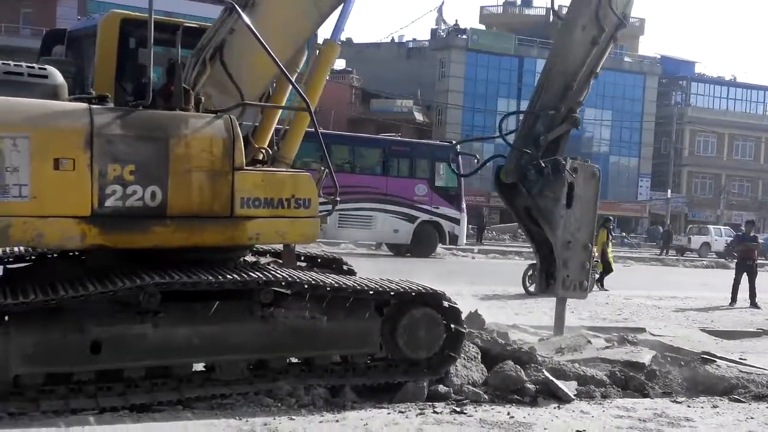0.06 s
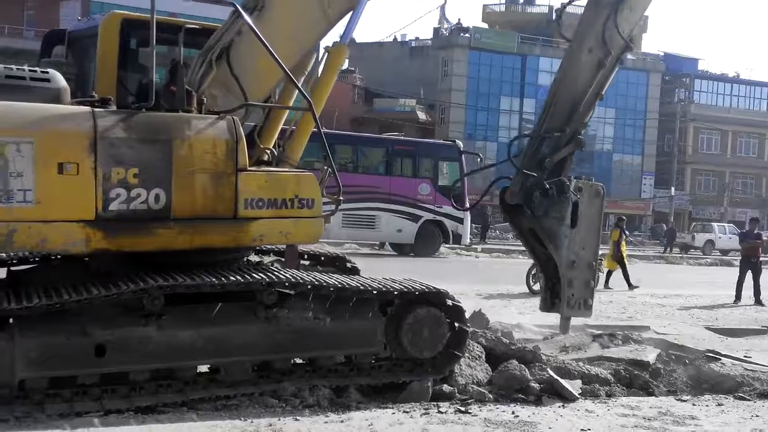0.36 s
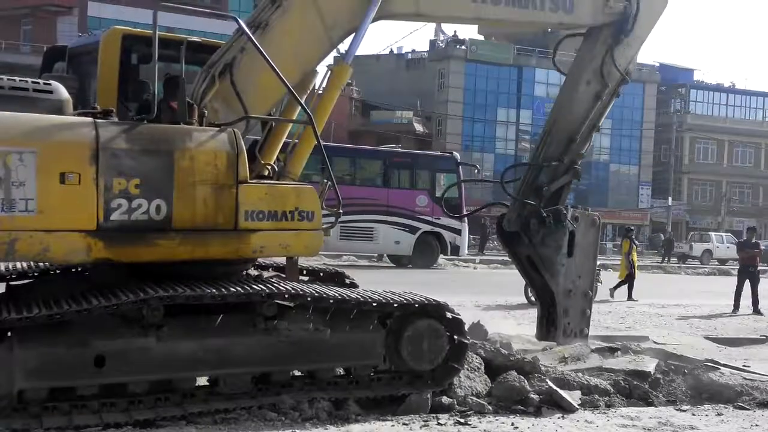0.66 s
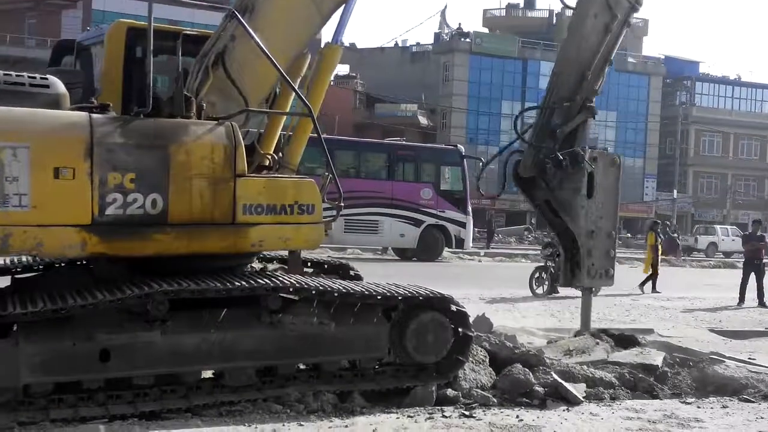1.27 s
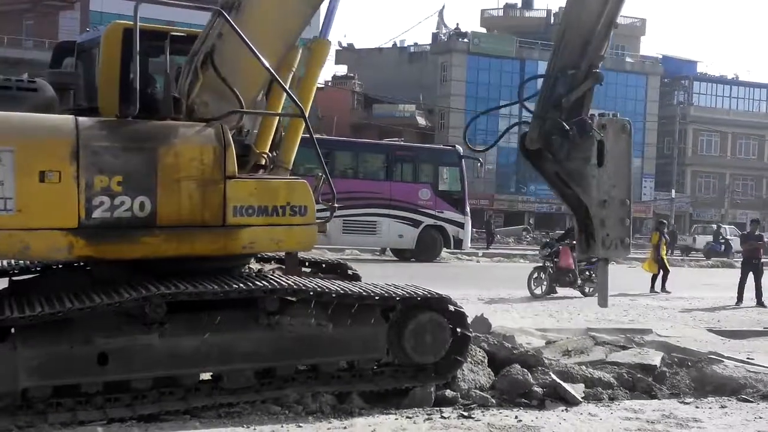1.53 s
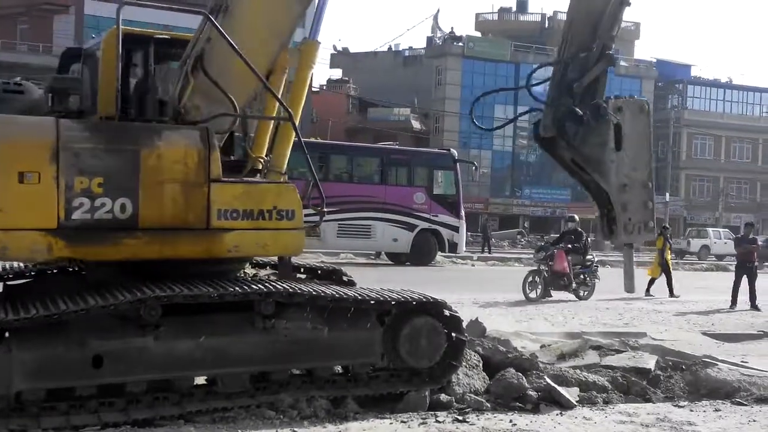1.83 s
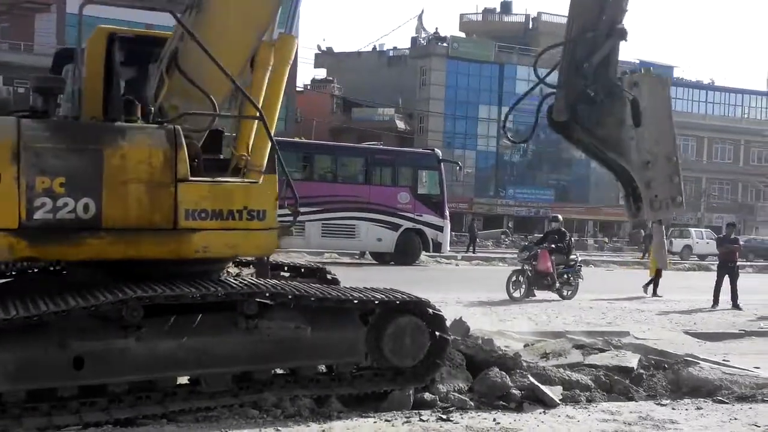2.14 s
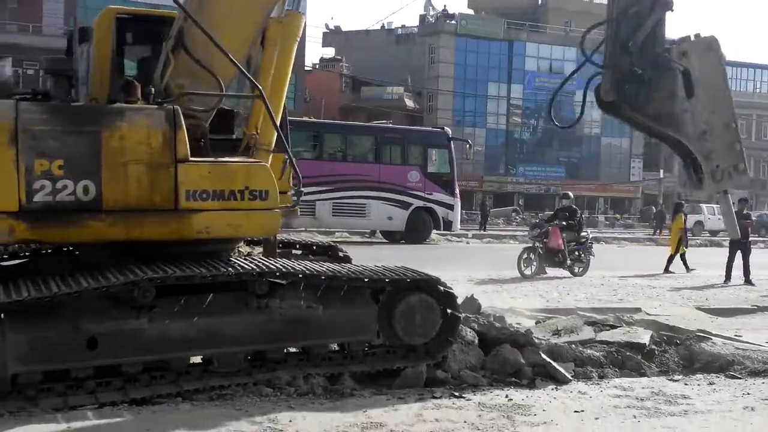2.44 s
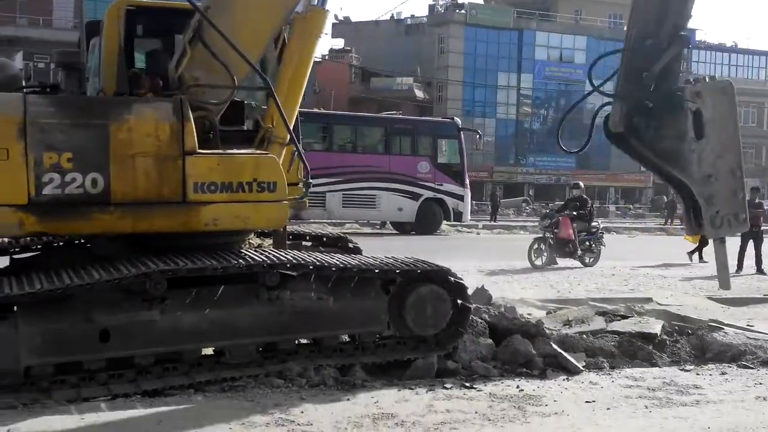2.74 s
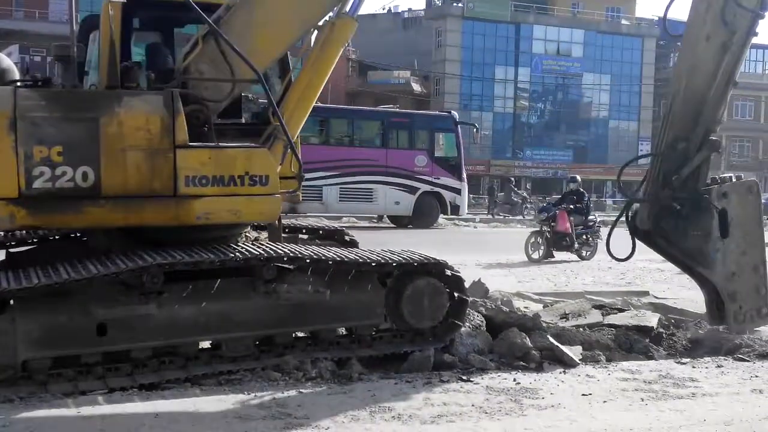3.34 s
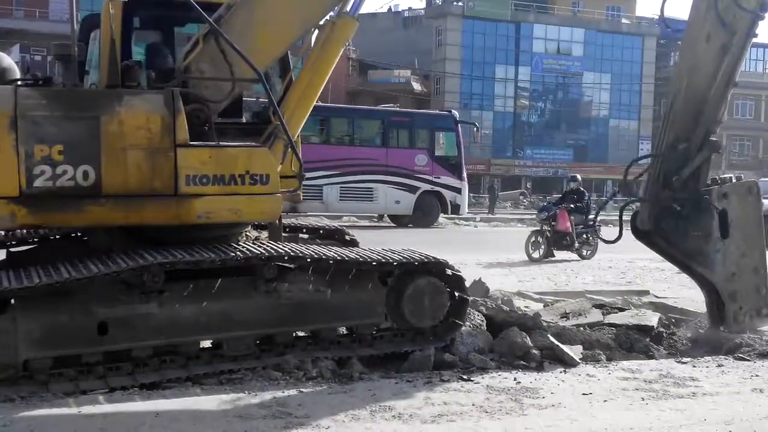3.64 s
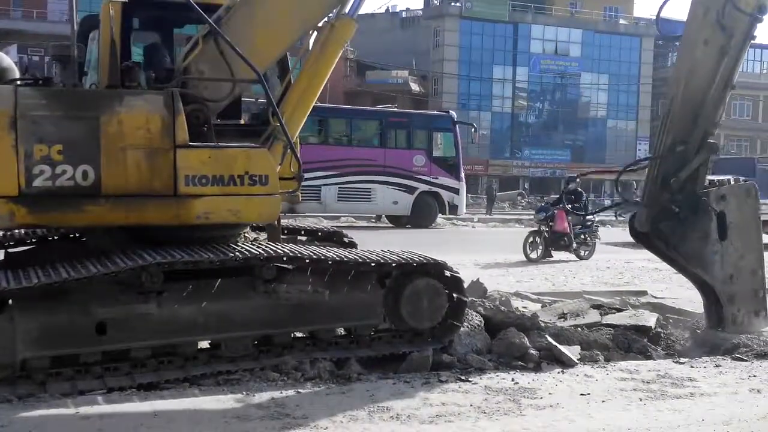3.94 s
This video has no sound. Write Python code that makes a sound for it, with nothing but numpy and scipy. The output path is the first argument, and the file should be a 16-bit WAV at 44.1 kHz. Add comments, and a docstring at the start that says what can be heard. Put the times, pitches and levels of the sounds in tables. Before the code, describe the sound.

An excavator drags its steel chisel through broken pavement twice, grinding, squeaking and clanking as chips snap and slabs thud over. Between drags, the diesel drones and hydraulics hiss. Faint street echoes follow the blows.

```python
"""Excavator prying up pavement

Beside a street, an excavator drags the chisel of its hydraulic breaker through broken pavement.
The chisel grinds, squeaks, clanks in its steel housing and snaps off chips; slabs thud over.
Underneath, the diesel drones, its turbocharger whistles and oil hisses in the valves.
The loudest blows overload the microphone."""
import sys
import numpy as np
from scipy import signal
from scipy.fft import rfft, irfft
from scipy.io import wavfile
from scipy.ndimage import uniform_filter1d

SR = 44100
rng = np.random.default_rng(int(sys.argv[2]) if len(sys.argv) > 2 else 0)


def master(y):
    """Save y as 16-bit WAV."""
    cut = np.clip(np.atleast_2d(y).T, -1, 1)
    pcm = np.round(cut * 32767)  # scale
    wavfile.write(sys.argv[1], SR, pcm.astype(np.int16))


N = 176400
T = np.arange(N) / SR

# the notes the steel housing rings at: pitch_hz, level_db, fade_s (time to fall by 60 dB)
HOUSING_NOTES = [(409.4, -3, 0.25), (692.6, 3, 0.21), (863, -3, 0.084), (1010, -9, .26), (1143, -8.5, 0.29),
                 (1247, 0, 0.28), (1395, 8.5, 0.067), (1740, -5, 0.25), (1904, -5.5, 0.19),
                 (2167, 5.5, 0.062), (2495, -4, 0.21), (3090, -13, 0.14)]
# the notes the chisel rings at: pitch_hz, level_db, fade_s
CHISEL_NOTES = [(1435, 1, 0.078), (2620, -10.5, 0.098), (2850, -3.5, 0.096), (3210, -12, 0.052),
                (3715, -4.5, 0.067), (4220, -9, 0.087), (5130, -2.5, 0.082), (6500, -5, 0.045),
                (7230, -10, 0.12), (8300, -6, 0.1), (8670, -8.5, 0.3), (9300, -23, 0.18),
                (10900, -16, 0.21)]


def from_db(db):
    """Turn decibels into a number to multiply by."""
    return 10 ** (np.asarray(db) / 20)


def unit_power(x):
    """Scale a signal to an average power of 1."""
    return x / np.sqrt(np.mean(x ** 2) + 1e-20)


def in_time(rows, outside=None):
    """Join rows of (time, values) with straight lines: one curve for each value column."""
    times, *columns = np.transpose(rows)
    return [np.interp(T, times, column, outside, outside) for column in columns]


def colour(x, spectrum):
    """Make some pitches stronger than others; those beyond the table's ends fall away."""
    hz, db = np.transpose(spectrum)
    log_hz = np.log(np.maximum(np.arange(N // 2 + 1) * SR / N, 1))
    beyond = np.abs(log_hz - np.clip(log_hz, np.log(hz[0]), np.log(hz[-1])))
    gain = from_db(np.interp(log_hz, np.log(hz), db)) * np.exp(-2 * beyond)
    return unit_power(irfft(rfft(x) * gain, N))


def noise(spectrum):
    """Steady noise with the given tone colour."""
    return colour(rng.standard_normal(N), spectrum)


def drift(rate_hz):
    """A smooth random wander of about 1 either way, mostly slower than rate_hz."""
    step, points = 32, 8192
    times = T[::step]
    hz = np.fft.rfftfreq(points, step / SR)
    slow = irfft(rfft(rng.standard_normal(points)) / (1 + (hz / rate_hz) ** 2))
    return unit_power(np.interp(T, times, slow[:len(times)]))


def burst(start_s, hold_s, fade_s, attack_s=0.002):
    """The loudness of one blow: it rises, holds, then falls 60 dB every fade_s, down to -120 dB."""
    age = T - start_s
    fall = np.clip((age - attack_s - hold_s) / fade_s, 0, 2)
    return np.clip(age / attack_s, 0, 1) * from_db(-60 * fall)


def swells(rows):
    """Loudness that rises and falls in smooth, bell-shaped humps."""
    return sum(from_db(db) * np.exp(-((T - peak) / width) ** 2) for peak, width, db in rows)


def ring(x, hz, fade_s):
    """Each click in x sets off one dying note."""
    decay = np.exp(-np.log(1000) / (fade_s * SR))
    turn = 2 * np.pi * hz / SR
    return signal.lfilter([0, np.sin(turn)], [1, -2 * decay * np.cos(turn), decay * decay], x + 1e-18)


def resound(x, notes):
    """A body shaken by x rings at all its notes."""
    return unit_power(sum(from_db(db) * ring(x, hz, fade) for hz, db, fade in notes))


def strike(blows, notes):
    """Each blow rings every note of a body, some harder than others by chance."""
    starts, strength_db = np.transpose(blows)[:2]
    chance_db = rng.normal(0, 3.3, (len(starts), len(notes)))
    out = np.zeros(N)
    for k, (hz, db, fade) in enumerate(notes):
        clicks = np.zeros(N)
        clicks[(starts * SR).astype(int)] = from_db(strength_db + db + chance_db[:, k])
        out += (-1) ** k * ring(clicks, hz, fade)
    return out


def whistle(hz, width_hz):
    """A breathy tone: a narrow band of noise around a moving pitch."""
    phase = 2 * np.pi * np.cumsum(hz) / SR
    return drift(width_hz) * np.sin(phase) + drift(width_hz) * np.cos(phase)


def grains(per_s=2500, spread_db=1.5):
    """A dense crackle of tiny fractures, uneven in size."""
    sizes = from_db(spread_db * np.minimum(rng.exponential(1, N), 4)) * rng.choice([-1, 1], N)
    return sizes * (rng.random(N) < per_s / SR)


def crumble(x, spread_db=4):
    """Breaking stone keeps changing shape, so each pitch swells and fades at random."""
    spectra = signal.stft(x, nperseg=1024)[2]
    chance = uniform_filter1d(rng.standard_normal(spectra.shape), size=4, axis=0)  # smooth over pitch
    chance = unit_power(uniform_filter1d(chance, size=3, axis=1))  # and over time
    return signal.istft(spectra * unit_power(from_db(spread_db * chance)), nperseg=1024)[1][:N]


def scraping():
    """The juddering point crushes concrete into coarse and fine grit, and both make the steel ring."""
    # two drags of the chisel, each a list of: time_s, grind_db, grit_db
    strokes = [
        [(0, -23.5, -36), (.17, -24, -48), (.21, -13, -23.5), (.3, -18.5, -28.5), (.42, -24.5, -26.5),
         (.485, -32.5, -38), (.53, -17, -13), (.62, -11, -26), (.67, -25, -18.5), (.85, -13.5, -22),
         (.9, -18.5, -15), (.97, -16, -14.5), (1.0, -24, -16.5), (1.1, -23, -28.5), (1.19, -64, -50)],
        [(2.695, -20.5, -33), (2.72, -17, -15), (2.83, -12, -16), (2.92, -15.5, -20.5), (3.07, -18.5, -30),
         (3.14, -25, -36), (3.21, -24, -50), (3.235, -14.5, -16), (3.32, -14, -14.5), (3.4, -11.5, -17.5),
         (3.48, -12.5, -15), (3.59, -16, -14.5), (3.68, -22, -26.5), (3.8, -41, -45), (3.895, -32, -47),
         (3.92, -23.5, -13.5), (4, -16, -26)],
    ]
    # tone colour of the coarse grinding: pitch_hz, level_db
    grind_colour = [(130, -9.5), (220, -3.5), (330, -4.5), (470, -11.5), (680, -4.5), (880, 0.5),
                    (1150, -9.5), (1420, -6), (1800, -16.5), (3000, -22), (6000, -31.5)]
    # tone colour of the fine grit: pitch_hz, level_db
    grit_colour = [(1000, 5), (2100, 7.5), (2900, 4.5), (4500, -1.5), (6000, -1.5), (8700, -0.5),
                   (10000, -3), (12000, -48)]
    grind_gain, grit_gain = sum(from_db(in_time(stroke, outside=-120)) for stroke in strokes)
    coarse = crumble(colour(grains(), grind_colour))
    fine = crumble(colour(grains(), grit_colour))
    grind = from_db(0.5) * coarse + from_db(-14) * resound(coarse, HOUSING_NOTES)
    grit = from_db(-2.5) * fine + from_db(-12.5) * resound(fine, CHISEL_NOTES) + from_db(-4) * clinks()
    judder = from_db(1.5 * drift(rate_hz=16))
    return judder * (grind_gain * grind + grit_gain * grit)


def clinks(stones=48, per_s=150, low_hz=800, high_hz=3605):
    """Loose stones of many sizes clink at random, each at its own pitch."""
    hits = (rng.random(N) < per_s / SR) * rng.uniform(0.26, 1, N) * rng.choice([-1, 1], N)
    stone_hit = rng.integers(0, stones, N)
    pitches = np.geomspace(low_hz, high_hz, stones) * rng.uniform(.98, 1.02, stones)
    rings = (ring(hits * (stone_hit == k), hz, fade_s=0.064) / np.sqrt(hz) for k, hz in enumerate(pitches))
    return unit_power(sum(rings))


def diesel():
    """The engine's firing, shaft and fan hum over a drone that throbs with each firing."""
    # engine speed and loudness of its hum: time_s, firing_hz, level_db
    running = [(0, 107.8, -39.5), (.46, 108.3, -38.5), (.6, 104.5, -29.5), (1.0, 104.5, -32),
               (1.19, 100.8, -27), (2.2, 99.3, -30), (2.45, 97.9, -34), (2.64, 102.9, -40),
               (2.88, 105.1, -27), (3.16, 104, -33.5), (3.62, 108, -29), (4, 110.4, -38)]
    # the tones in the hum: multiple_of_firing_rate, level_db
    tones = [(1, 1), (2.86, -10.5), (3.33, -18), (5.11, -20.5)]
    # tone colour of the drone: pitch_hz, level_db
    drone_colour = [(25, -14), (45, -36), (75, -6.5), (130, -13.5), (175, -6), (250, -14.5), (320, -5.5),
                    (470, -19), (620, -22), (1000, -20.5), (2000, -24), (3500, -30), (6000, -37)]
    firing_hz, hum_db = in_time(running)
    phase = 2 * np.pi * np.cumsum(firing_hz * (1 + 0.0041 * drift(9.5))) / SR
    hum = np.zeros(N)
    for multiple, db in tones:
        level = from_db(hum_db + db + 1.46 * drift(13))
        hum += level * np.sin(multiple * phase + 0.09 * drift(4.4))
    throb = 1 + 0.048 * np.sin(phase)
    return np.sqrt(2) * hum + from_db(-29.5) * noise(drone_colour) * throb


def turbo():
    """A high, wavering whistle that follows the turbine's speed and flares three times."""
    # the whistle's path: time_s, pitch_hz
    path = [(0, 12500), (.125, 11570), (.45, 11000), (.7, 10600), (.92, 11550), (1.04, 11350),
            (1.25, 12200), (1.48, 12400), (2.05, 12350), (2.42, 13070), (2.62, 12290), (2.95, 11520),
            (3.2, 11290), (3.55, 12180), (3.7, 11420), (3.81, 11740), (4, 11230)]
    # its flares: peak_s, half_length_s, level_db
    flares = [(0.194, 0.041, -34.5), (1.016, 0.076, -34), (3.76, 0.089, -47)]
    hz, = in_time(path)
    level = from_db(-45.5 + 4 * drift(4.5)) + swells(flares)
    return level * whistle(hz, width_hz=120)


def oil():
    """Oil hisses through the valves, which sing in wavering whistles as the boom (the arm) lifts."""
    # loudness of the hiss: time_s, level_db
    flow = [(0, -33), (.5, -34), (1.1, -34), (1.6, -36.5), (1.9, -36), (2.6, -36.5), (3.2, -34.5),
            (3.8, -42), (4, -26)]
    # tone colour of the hiss: pitch_hz, level_db
    hiss_colour = [(3000, -9), (5600, -14), (6900, -3.5), (7700, -3), (8500, 1.5), (9250, 0.5),
                   (9900, -4.5), (11000, -5.5), (13000, -22), (16000, -23)]
    # loudness of the singing: time_s, level_db
    lift = [(.5, -40), (1.1, -34), (1.28, -29), (1.45, -34), (1.6, -33), (1.9, -42), (2.33, -37),
            (2.6, -46)]
    # the valves' whistles: pitch_hz, width_hz, level_db
    valves = [(3870, 89, -19), (7030, 110, -10.5), (9200, 320, -2.5)]
    hiss_db, = in_time(flow)
    singing_db, = in_time(lift)
    singing = np.zeros(N)
    for hz, width, db in valves:
        singing += from_db(db + 4 * drift(3.5)) * whistle(hz + 50 * drift(6.9), width)
    flutter = from_db(1.05 * drift(37))
    return flutter * (from_db(hiss_db) * noise(hiss_colour) + from_db(singing_db) * singing)


def rattles(rest_db=-51):
    """The housing buzzes faintly all the time, and more when the boom swings."""
    # shudders of the housing: peak_s, half_length_s, level_db
    shudders = [(1.6, 0.1, -39.5), (2.039, 0.063, -45), (2.45, 0.058, -38.5)]
    # tone colour of the shaking: pitch_hz, level_db
    shake_colour = [(400, -44), (900, 21), (1500, -1), (2500, 12), (4000, 10), (6000, -10)]
    level = from_db(rest_db) + swells(shudders)
    return level * resound(colour(grains(), shake_colour), HOUSING_NOTES)


def squeaks(sag=0.13):
    """Steel sticks and slips on stone: short, rough tones that sag in pitch."""
    # the squeaks: start_s, length_s, pitch_hz, level_db
    slips = [(0.034, 0.038, 853, -12), (0.128, 0.032, 868, -14.5), (0.19, 0.044, 929, -18.5),
             (0.372, 0.036, 864, -20), (0.873, 0.03, 906, -20), (1.075, 0.029, 907, -33),
             (3.003, 0.023, 883, -10.5), (3.044, 0.031, 865, -14), (3.248, 0.036, 839, -10.5),
             (3.358, 0.029, 847, -10.5), (3.467, 0.023, 934, -5.5), (3.914, 0.029, 877, -8)]
    wobble = 1 + 0.03935 * drift(151.5)
    out = np.zeros(N)
    for start, length, hz, db in slips:
        progress = np.clip((T - start) / length, 0, 1)
        phase = 2 * np.pi * np.cumsum(hz * wobble * (1 - sag * (progress - .5))) / SR
        tone = np.sin(phase) + from_db(-12.5) * np.sin(1.72 * phase)  # with a weaker, higher note
        out += from_db(db) * np.sin(np.pi * progress) * tone
    roughness = from_db(4.4 * drift(180))
    return np.sqrt(2) * out * roughness


def chinks():
    """Steel chatters on stone, or in its pins as the boom lifts: brief, slightly rough notes."""
    # the contacts: start_s, pitch_hz, level_db, hold_s
    contacts = [(0.19, 4310, -17, 0.0088), (0.206, 5110, -18.5, 0.0054), (.68, 4070, -20, .012),
                (0.778, 2776, -11.5, 0.0085), (0.869, 5600, -17, 0.019), (1.585, 1010, -30, .025),
                (1.589, 2514, -37.5, 0.027), (2.37, 1386, -28, 0.018), (2.43, 1795, -32, 0.057),
                (2.442, 1387, -26, 0.024), (3.494, 5330, -18.5, 0.03)]
    chatter = drift(rate_hz=84)
    out = np.zeros(N)
    for start, hz, db, hold in contacts:
        tone = np.sin(2 * np.pi * hz * (T - start) + chatter)
        out += from_db(db) * burst(start, hold, fade_s=0.084) * tone
    return out


def clanks():
    """The breaker knocks in its mounting with a crash and a hollow ring; the chisel pings on stone."""
    # knocks in the mounting: start_s, ring_db, crash_db
    knocks = [(.195, -34, -23), (.506, -39, -16), (.531, -25, -12), (.738, -29, -9.5), (.779, -32, -14.5),
              (.874, -7, -6), (.917, -21, -13), (2.361, -25, -29.5), (2.606, -24, -23), (2.62, -16, -26),
              (2.703, -10.5, -25), (2.72, -21, -10.5), (2.783, -7, -8.5), (2.818, -7, -6),
              (2.96, -12.5, -18.5), (3.22, -13.5, -11.5), (3.362, -10, -14), (3.463, -26, -7),
              (3.906, -11.5, -7.5)]
    # tone colour of the crash: pitch_hz, level_db
    crash_colour = [(200, -41), (500, -7), (800, 4.5), (1500, -8.5), (2200, -6.5), (3300, -6),
                    (4600, -14.5), (6500, -16), (9000, -8), (11000, -60.5)]
    # chisel hits on stone: start_s, level_db
    pings = [(.197, -15), (.738, -12.5), (2.783, -23), (3.22, -11), (3.232, -9.5), (3.907, -23)]
    level = sum(from_db(db) * burst(start, hold_s=0.0062, fade_s=0.085) for start, _, db in knocks)
    crash = level * crumble(noise(crash_colour))
    return crash + from_db(-9.5) * strike(knocks, HOUSING_NOTES) + strike(pings, CHISEL_NOTES)


def thuds():
    """Heavy slabs tip and drop with dull bursts of noise."""
    # the drops: start_s, level_db
    drops = [(0.205, -15.5), (0.266, -24), (0.528, -12.5), (.575, -18), (.88, -14), (1.04, -22),
             (2.44, -29), (2.614, -16.5), (2.728, -25.5), (2.847, -14), (3.409, -16), (3.48, -11),
             (3.56, -18)]
    # tone colour of a thud: pitch_hz, level_db
    thud_colour = [(25, -21), (60, -7), (110, -5), (170, -11.5), (232, 6.5), (310, 7.5), (400, 0),
                   (600, -5), (1200, -8)]
    level = sum(from_db(db) * burst(start, hold_s=0.0088, fade_s=0.41, attack_s=0.0018)
                for start, db in drops)
    return level * noise(thud_colour)


def snaps():
    """Chips break off under the point in shrill bursts, each with a faint tail."""
    # the breaks: start_s, level_db, hold_s
    chips = [(0.375, -10, 0.0091), (0.706, -10.5, 0.0048), (0.735, -4, 0.011), (0.808, -2.5, 0.013),
             (0.873, -6.5, 0.011), (1.018, -29, 0.011), (2.461, -28.5, 0.039), (2.719, -11, .006),
             (2.779, -25.5, 0.03), (2.813, -12, 0.021), (2.988, -25, 0.0051), (3.254, -1, 0.0041),
             (3.337, -5.5, 0.012), (3.361, -16, 0.0065), (3.414, -21.5, 0.025), (3.458, -11, 0.011),
             (3.523, -19, 0.0064), (3.573, -19.5, 0.0087), (3.905, -8, 0.0088), (3.971, -7.5, 0.007)]
    # tone colour of a snap: pitch_hz, level_db
    snap_colour = [(500, -48), (1500, -16), (3500, -11.5), (5000, -15), (6400, -3.5), (7500, 1),
                   (8600, 4.5), (9600, 1.5), (10800, -10.5), (13000, -15.5), (16000, -38)]
    level = np.zeros(N)
    for start, db, hold in chips:
        tail = from_db(-14.5) * burst(start, hold, fade_s=0.38)
        level += from_db(db) * (burst(start, hold, fade_s=0.037) + tail)
    return level * crumble(noise(snap_colour))


def low_booms():
    """Brief, low, hollow booms from loose slabs or the knocked steel housing."""
    # the low booms: start_s, pitch_hz, level_db
    notes = [(.556, 286, -23), (2.62, 419, -15), (2.721, 236.2, -4.5), (2.848, 224, -14), (3.473, 287, -9),
             (3.578, 386, -12)]
    out = np.zeros(N)
    for start, hz, db in notes:
        level = from_db(db) * burst(start, hold_s=0.0032, fade_s=0.19, attack_s=0.0099)
        out += level * np.sin(2 * np.pi * hz * (T - start))
    return out


def street(x, cutoff_hz=5700):
    """Add a few dull echoes off the machine and the house fronts."""
    # the echoes: delay_s, level_db
    echoes = [(0.022, -13.5), (.047, -18.5), (0.082, -22), (.16, -21)]
    dull = signal.sosfilt(signal.butter(1, cutoff_hz, fs=SR, output="sos"), x)
    return x + sum(from_db(db) * np.interp(T - delay, T, dull, left=0) for delay, db in echoes)


def scene():
    """The echoing work at the chisel over the running machine, in one channel."""
    work = scraping() + clanks() + snaps() + chinks() + thuds() + low_booms() + squeaks() + rattles()
    return (street(work) + diesel() + turbo() + oil())[None]


def record(dry):
    """The microphone flattens the loudest peaks, and the highest treble is cut."""
    overload, cutoff_hz = 0.93, 15800
    clipped = dry / (1 + (dry / overload) ** 4) ** (1 / 4)
    return signal.sosfilt(signal.ellip(10, .1, 70, cutoff_hz, fs=SR, output="sos"), clipped)


dry = scene()
out = record(dry)
master(out)
```